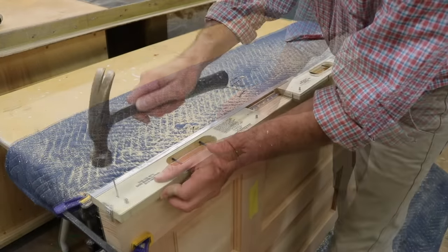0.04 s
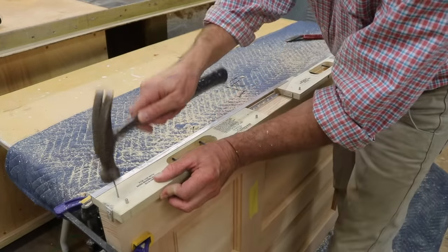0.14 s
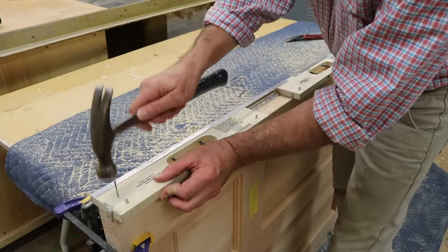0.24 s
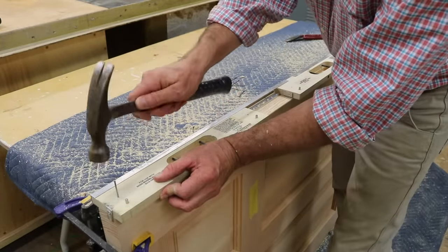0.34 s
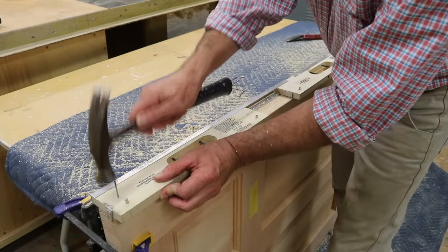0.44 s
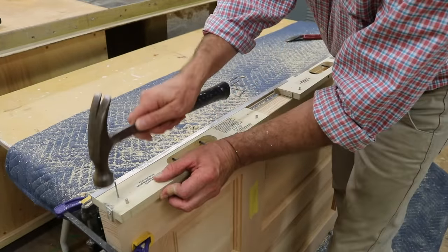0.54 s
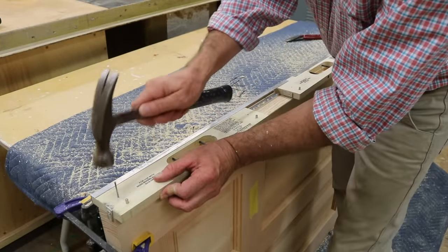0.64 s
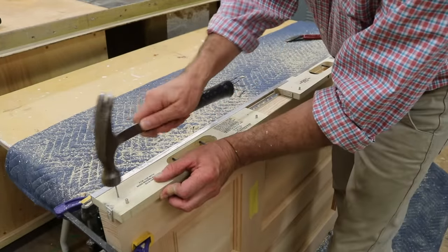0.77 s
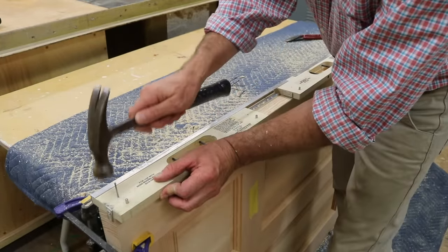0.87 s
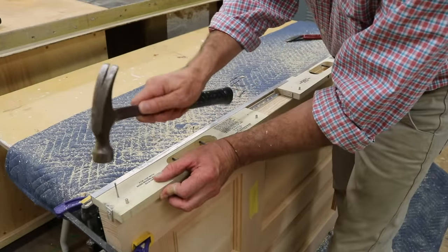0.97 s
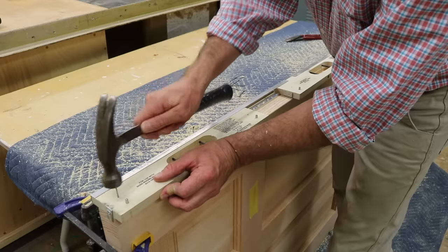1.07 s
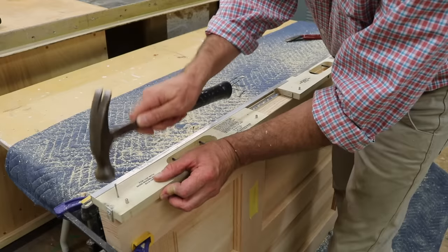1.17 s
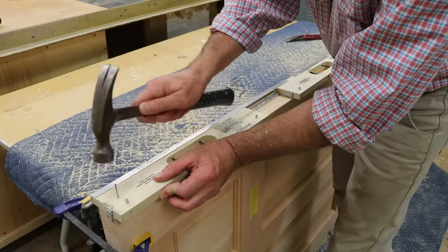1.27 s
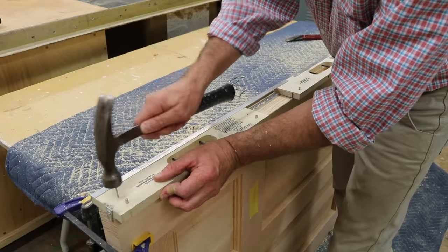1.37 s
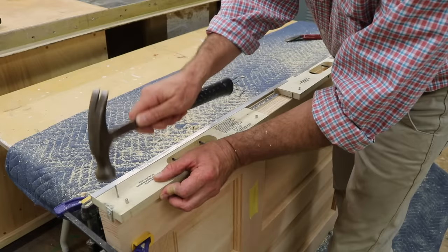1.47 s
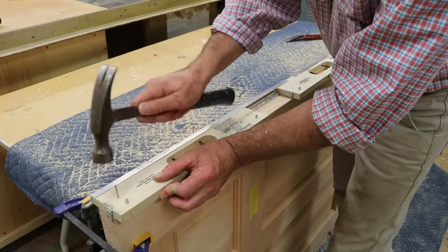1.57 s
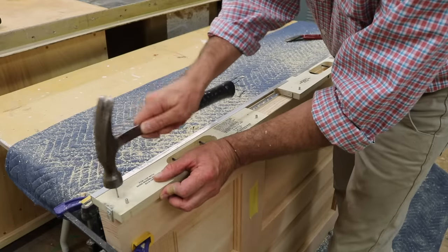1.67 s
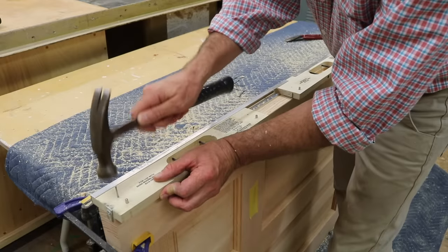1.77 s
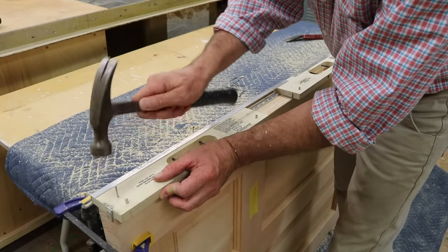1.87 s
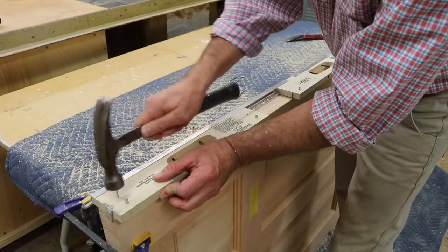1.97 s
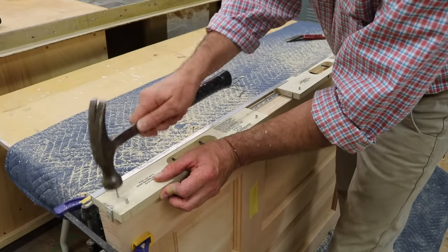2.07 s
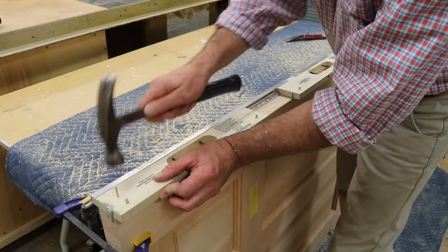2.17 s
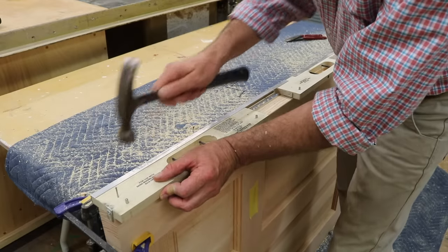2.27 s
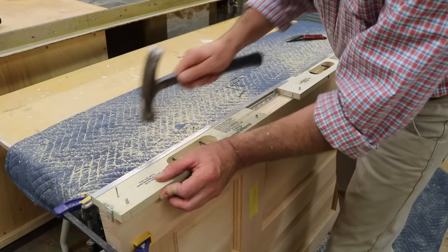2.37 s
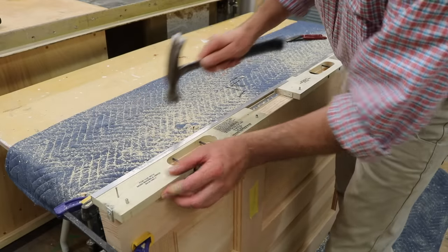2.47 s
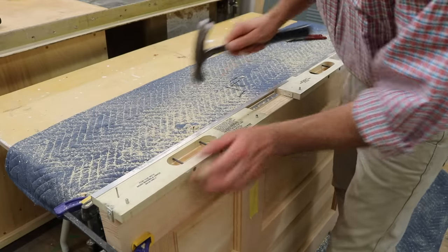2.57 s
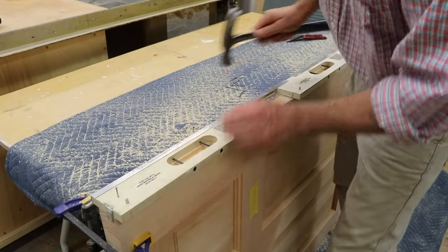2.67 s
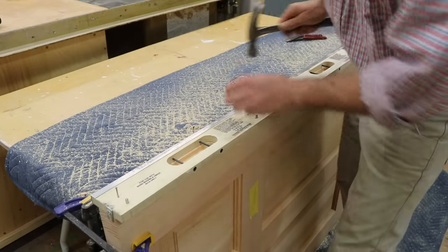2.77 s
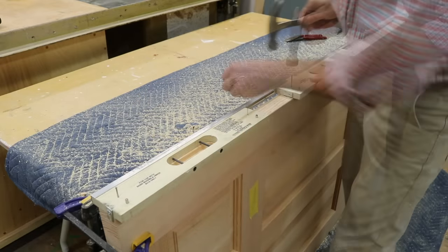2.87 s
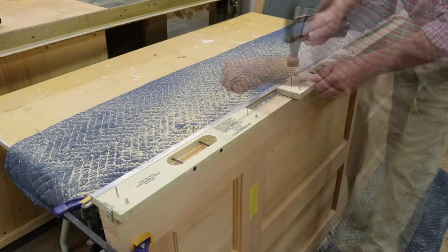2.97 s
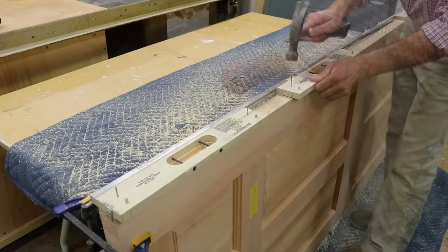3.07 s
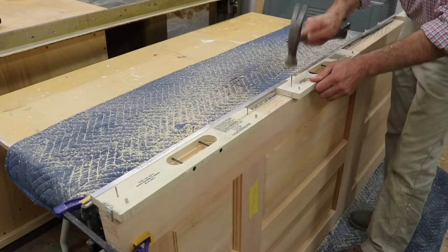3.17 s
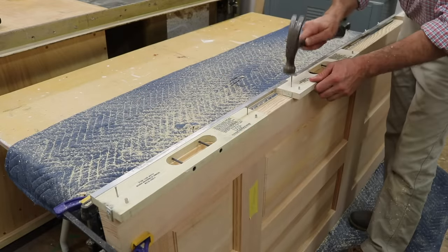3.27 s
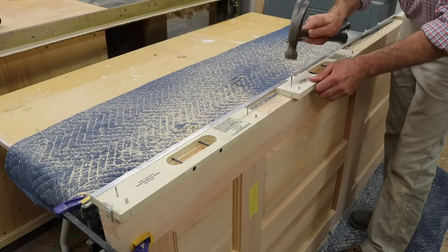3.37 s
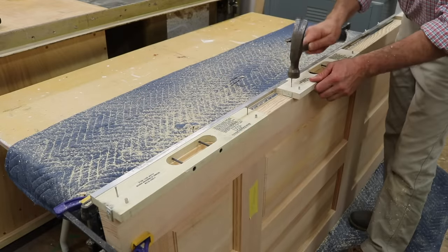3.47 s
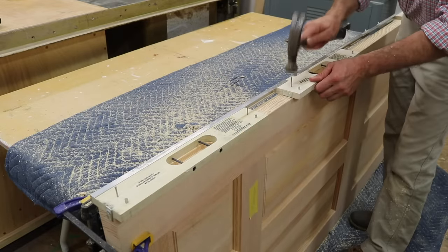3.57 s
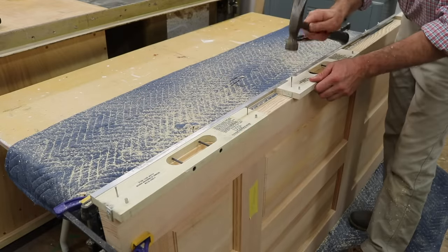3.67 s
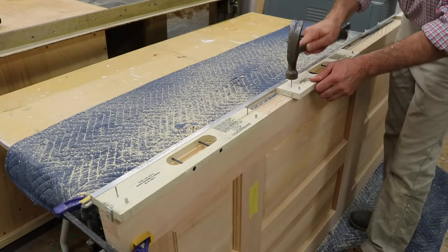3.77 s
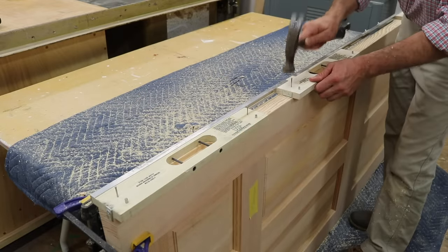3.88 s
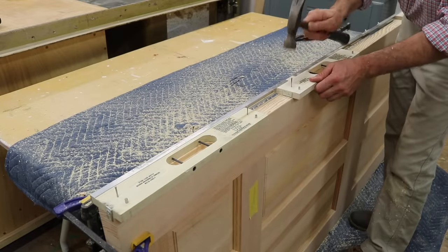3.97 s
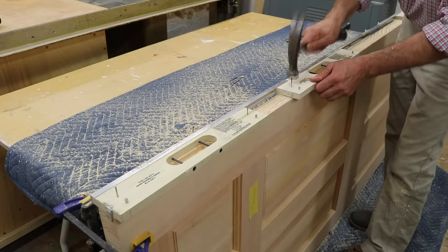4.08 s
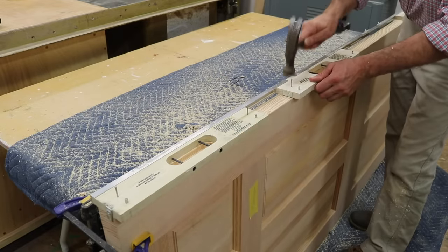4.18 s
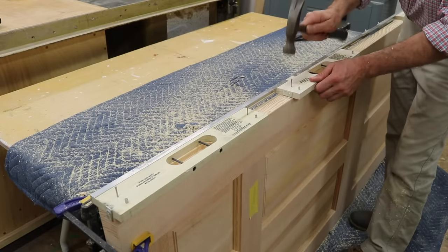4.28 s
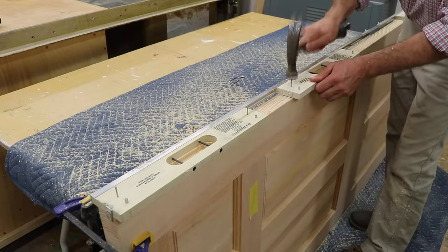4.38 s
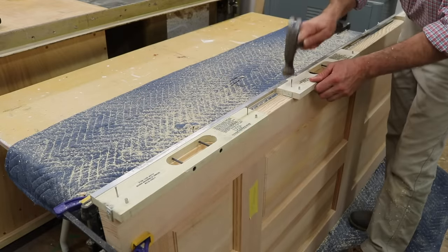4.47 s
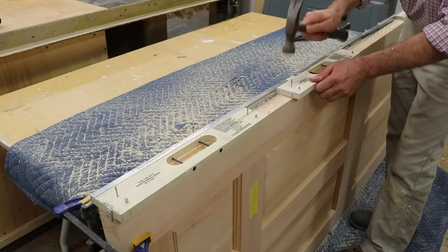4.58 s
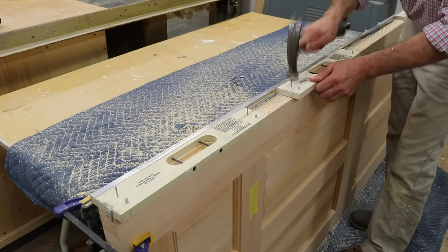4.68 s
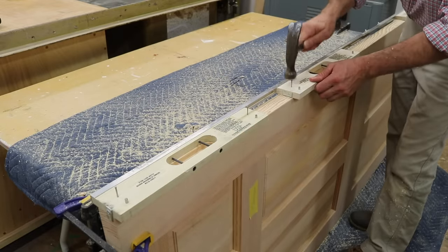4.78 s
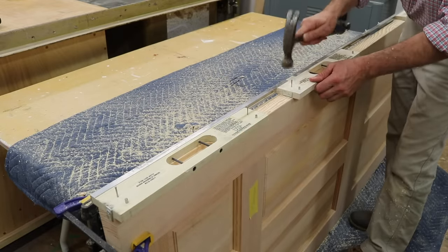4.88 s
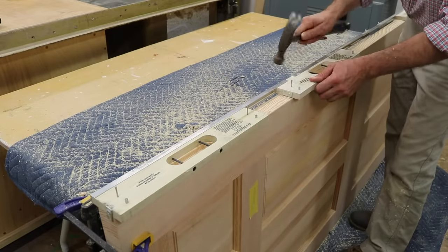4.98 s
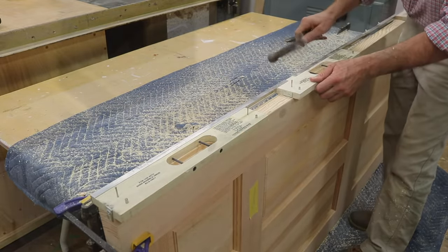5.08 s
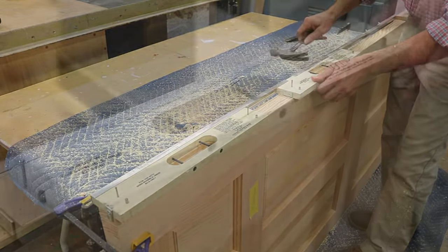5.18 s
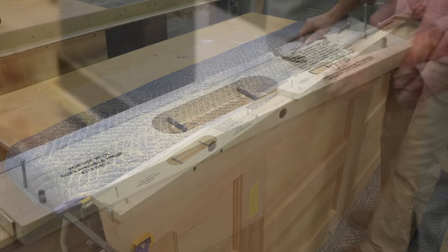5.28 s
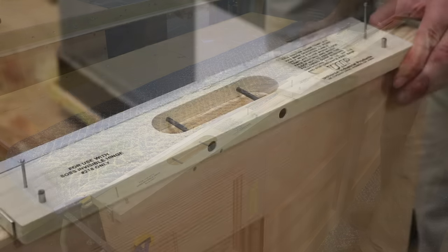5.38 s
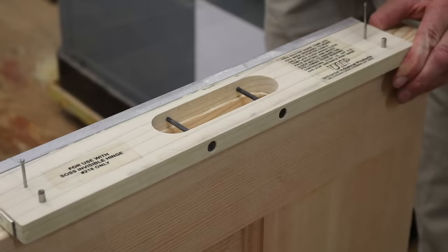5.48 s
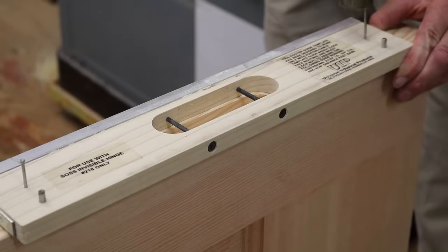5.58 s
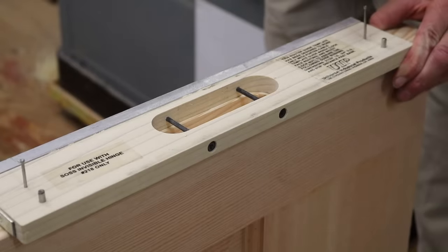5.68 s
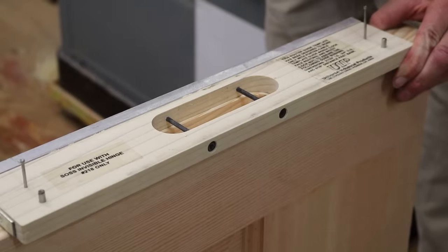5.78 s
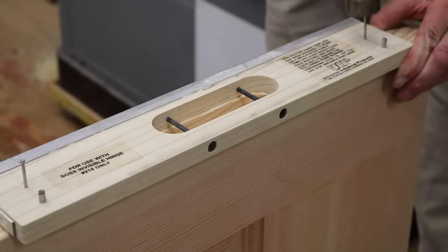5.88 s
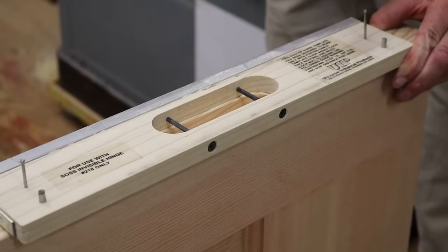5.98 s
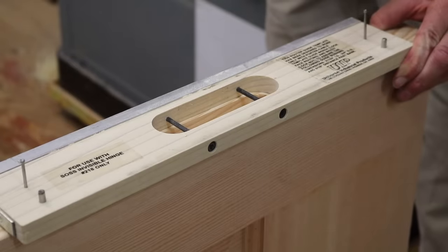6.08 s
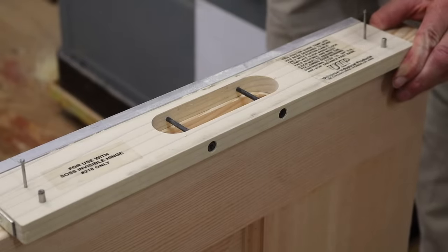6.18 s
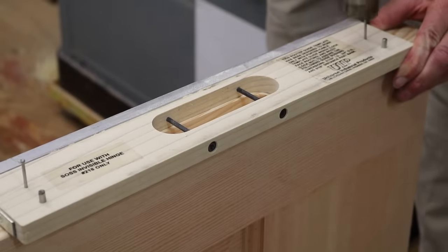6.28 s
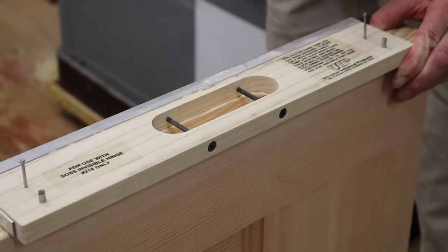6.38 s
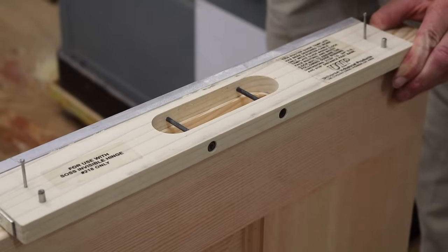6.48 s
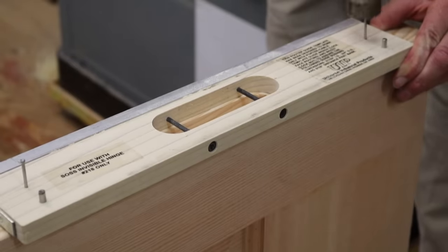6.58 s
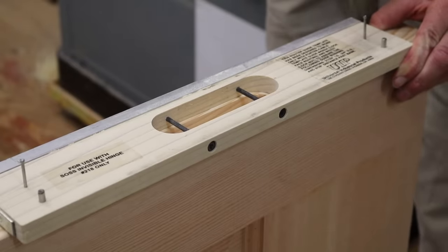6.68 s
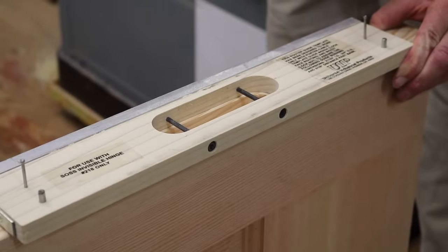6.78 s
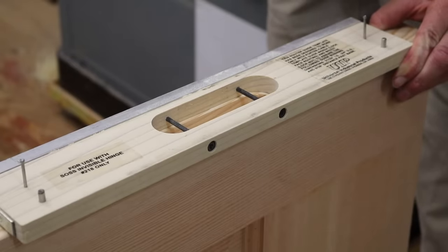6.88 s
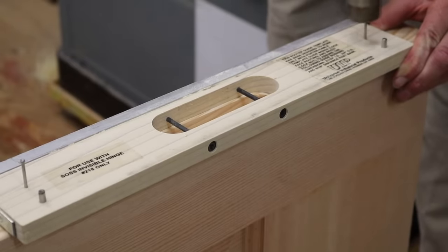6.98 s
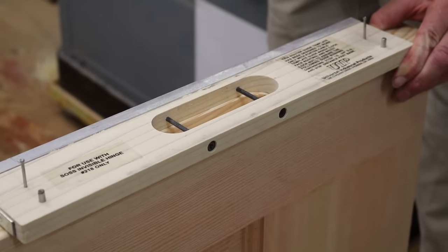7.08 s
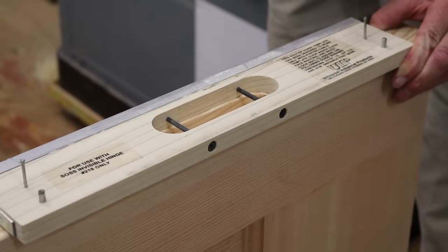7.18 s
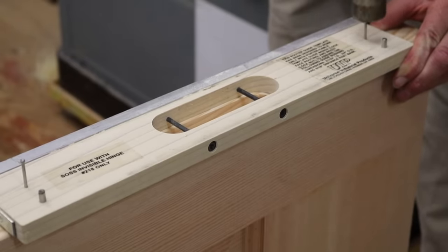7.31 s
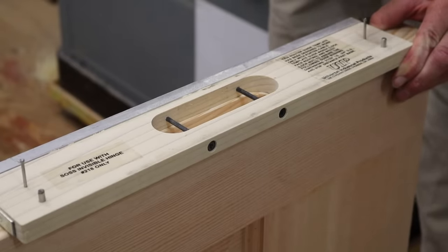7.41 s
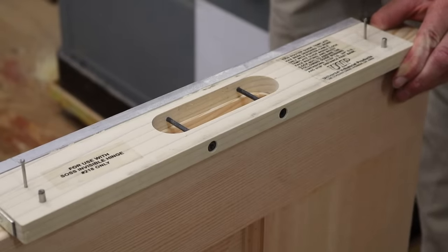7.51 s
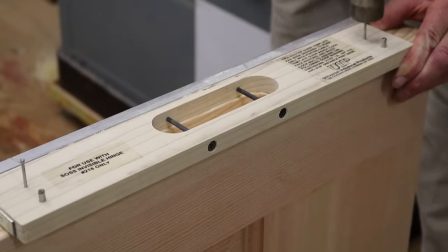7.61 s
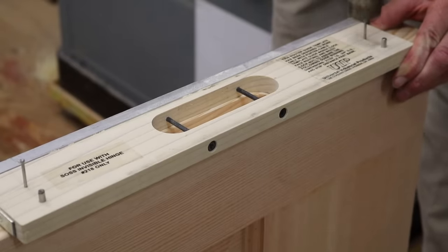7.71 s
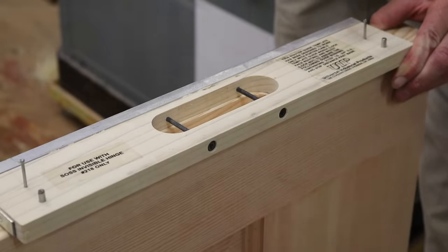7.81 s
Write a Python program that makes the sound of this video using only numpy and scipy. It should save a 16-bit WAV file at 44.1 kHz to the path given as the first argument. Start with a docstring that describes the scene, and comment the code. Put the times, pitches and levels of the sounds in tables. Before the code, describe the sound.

A close single microphone in a moderately live workshop, with quiet room air and faint hiss. After a small bump at 0.1 s, a hammer starts a nail through a wooden jig into a door: seven blows from 0.2 to 2.0 s, about 0.3 s apart, beginning light and bright with a steely ping, then growing harder and mostly rising in pitch. From 2.4 to 3.2 s hands bump and sleeves rustle. Six blows follow on a second nail, 3.3 to 4.75 s, woody and ringing, again climbing. More bumps and cloth at 5.2 to 5.5 s. The third nail starts with a dull, soft tap at 5.6 s, then six harder blows from 5.9 to 7.7 s, the last ones high and cracking. Each leaves a half-second diffuse echo, ducked then swelling back. A low rumble grows from 5.5 s.

```python
"""In a workshop, a steel hammer taps three nails in turn through a wooden jig into a door standing on edge.
As a nail sinks the wood grips it more stiffly, so the knock tends to rise in pitch from blow to blow.
Each blow sums a hammer bounce filtered by door modes, a steel click and a nail ping; a noise echo is the room.
Hands bump the jig and sleeves slide (shaped noise) over room air, hiss and, at the last nail, a rumble.
One microphone feeds a recorder whose limiter ducks the hard blows and lets their echo swell back."""
import sys
import numpy as np
from scipy import signal
from scipy.fft import rfft, irfft, next_fast_len
from scipy.io import wavfile
from scipy.ndimage import uniform_filter1d

SR = 44100
rng = np.random.default_rng(int(sys.argv[2]) if len(sys.argv) > 2 else 0)


def pcm_store(signal):
    """Save signal as 16-bit PCM."""
    levels = np.round(np.clip(np.atleast_2d(signal), -1, 1) * 32767)
    wavfile.write(sys.argv[1], SR, levels.astype(np.int16).T)


N = 346089  # length in samples
TIME = np.arange(SR) / SR  # s, the one-second span in which each single sound is built
HZ = np.fft.rfftfreq(SR, 1 / SR)  # frequencies of that span's spectrum

# the three nails: nearness to the microphone, bounce sharpness, softness of the first tap, ping and shank overtone
# near_db [dB], q [Q before grip and softness], softness [0-1], loose_ping_hz [Hz], ping_db [dB, first blow],
# overtone [times the bounce pitch], shank_db [dB]
NAILS = [(-1, 1.63, .12, 10840, 7, 4, -9), (-2, 1.54, .3, 12500, 0.5, 2.6, -9),
         (-0.5, 1.56, 1, 12000, -8.5, 2.47, -5)]
LOOSE_LEFT = 0.3  # share of a nail's looseness left after each blow
MEDIUM_DB, MEDIUM_HZ = 25, 1500  # strength and bounce pitch of a medium blow


def amp(db):
    """Decibels to gain."""
    return 10 ** (np.asarray(db) / 20)


def unit(x):
    """Scale to rms 1."""
    return x / np.sqrt(np.mean(x ** 2) + 1e-20)


def along(points, hz):
    """Read (Hz, value) points on a log frequency axis."""
    point_hz, values = np.transpose(points)
    return np.interp(np.log(hz + 1), np.log(point_hz + 1), values)


def filtered(x, response):
    """Filter x by a response given as a function of frequency."""
    size = next_fast_len(N + SR // 2)
    spectrum = rfft(x, size) * response(np.fft.rfftfreq(size, 1 / SR))
    return irfft(spectrum, size)[:N]


def noise(spectrum):
    """Coloured noise of rms 1."""
    return unit(filtered(rng.standard_normal(N), lambda hz: amp(along(spectrum, hz))))


def causal(gain):
    """The minimum-phase response with this gain: its energy comes as early as it can."""
    cepstrum = irfft(np.log(np.maximum(gain, 1e-6)))
    return np.exp(rfft(2 * cepstrum * (TIME < .5)) - cepstrum[0])


def burst(t60):
    """Spectrum of a noise of energy 1 that dies by 60 dB in t60 seconds."""
    x = rng.standard_normal(SR) * amp(-60 * TIME / t60)
    return rfft(x / np.linalg.norm(x))


def add(track, s, sound):
    """Mix a sound into the track at s seconds, letting its end die away."""
    start = round(s * SR)
    sound = sound * np.clip((.95 - TIME) / .2, 0, 1)
    track[start:start + len(sound)] += sound[:N - start]


def background(air_db=-67, hiss_db=-66.5):
    """Quiet room air, white microphone hiss, and a deep rumble of the work shaking that grows at the last nail."""
    # still room air: hz [Hz], level_db [dB per Hz, relative]
    air = [(25, -11), (92, -6.5), (250, -14.5), (850, -12), (1500, -21.5), (3000, -21.5), (6000, -29),
           (16000, -49.5)]
    # rumble of the shaking work: hz [Hz], level_db [dB per Hz, relative]
    rumble = [(10, -32.5), (25, 7), (45, 12), (80, -9), (200, -48), (600, -100)]
    shake_s, shake_rise_s, shake_db = 5.48, 1.9, -47  # start, swelling time, level at full size
    swell = np.clip((np.arange(N) / SR - shake_s) / shake_rise_s, 0, 1)
    hiss = amp(hiss_db) * rng.standard_normal(N)
    return amp(air_db) * noise(air) + hiss + amp(shake_db) * swell * noise(rumble)


def bounce(hz, q):
    """The hammer's mass on the springy nail: force is resonant near hz and falls away above."""
    return 1 / (1 - (HZ / hz) ** 2 + 1j * HZ / (hz * q))


def resonance(hz, width):
    """One damped mode with peak gain 1 and a width in Hz."""
    return 1j * HZ * width / (hz ** 2 - HZ ** 2 + 1j * HZ * width)


def door(nail, base_width_hz=11, scatter_db=2.5, haze_t60=0.054, bend_s=0.002002, fine_share=.6):
    """Modes of wood ring at one nail, as heard directly and as radiated into the whole room."""
    # modes of door and jig, driven according to where the nail stands:
    # hz [Hz], nail_0_db, nail_1_db, nail_2_db [dB before scatter]
    wood_modes = [(93, 12.5, 10.5, 3), (148.6, 6.5, 6, 0), (193.4, -0.5, -6, 1.5), (249.5, -15, -6.5, -5.5),
                  (295.3, -4.5, -2.5, -5.5), (368, 5, -3.5, 2), (441, 2.5, -15, -25),
                  (506.7, -7.5, -1, 3.5), (553, -5.5, -4.5, -6), (602.7, 6, 1, -1), (675.5, 1.5, 5.5, -4.5),
                  (733, 2.5, 6, 0), (804.7, 1.5, 7, 4.5), (933, -11.5, 0.5, -7.5), (1112, -6.5, -9, -5),
                  (1189, -8, 5.5, -30), (1339, -16, 0.5, -11), (1444, -24.5, 2, -4),
                  (1602, -0.5, -6.5, -41), (2247, 3.5, -17.5, -2), (2750, -10, -21.5, -1.5),
                  (2990, -5, -18.5, 5.5), (3380, 8.5, -14, -3)]
    # countless small wood modes: hz [Hz], level_db [dB]
    small_modes = [(100, -12), (300, -7.5), (1000, -3), (2000, -6.5), (3000, -4.5), (3800, 1), (4800, 1),
                   (6500, -1), (9000, -10.5), (15000, -20.5)]
    modes = np.array(wood_modes, float)
    hz = modes[:, :1]
    gain = amp(modes[:, 1 + nail, None] + scatter_db * rng.standard_normal(hz.shape))
    rings = gain * resonance(hz, base_width_hz + .018 * hz)
    signs = (-1) ** np.arange(len(hz))[:, None]
    ring = np.sum(signs * rings, axis=0)
    haze = amp(along(small_modes, HZ))
    # bending waves are slower at low pitch, so the knock blooms after the click; bend_s is the lag at 1 kHz
    lag = np.exp(-4j * np.pi * bend_s * np.sqrt(HZ * 10 ** 3))
    direct = lag * ring + burst(haze_t60) * causal(haze)
    # over all directions the modes add in power; fine peaks hold up to fine_share of the midrange power
    share = fine_share * along([(200, 0), (500, 1), (3500, 1), (7000, 0)], HZ)
    fine = 1 - share + share * np.abs(burst(.08)) ** 2
    power = np.sum(rings.real ** 2 + rings.imag ** 2, axis=0) + haze ** 2
    radiated = causal(np.sqrt(fine * power))
    return direct, radiated


def echo(first_wall=0.001, build_up=0.0031):
    """A diffuse workshop echo: noise builds up within milliseconds, then decays, fastest in the top treble."""
    # decay time of the room: hz [Hz], t60_s [s]
    decay_times = [(80, 0.49), (200, 0.47), (1000, .56), (3000, 0.53), (7000, 0.5), (14000, .32)]
    # echo against direct sound: hz [Hz], level_db [dB]
    echo_levels = [(80, 2.5), (300, 5), (1000, -3.5), (3000, -5), (6000, -6), (10000, -10), (15000, -13)]
    hz, t, bands = signal.stft(rng.standard_normal(SR), SR, nperseg=256)
    t60 = along(decay_times, hz)[:, None]
    even_energy = np.sqrt(2 * np.log(1000) / (t60 * SR))  # same energy whatever the decay time
    tail = signal.istft(bands * amp(-60 * t / t60) * even_energy, SR, nperseg=256)[1][:SR]
    arrival = 1 - np.exp(-np.maximum(TIME - first_wall, 0) / build_up)
    return rfft(tail * arrival) * causal(amp(along(echo_levels, HZ)))


def heard(direct, radiated):
    """Direct sound plus the room's answer at the microphone."""
    return direct + radiated * echo()


def handling(cloth_db=-4):
    """Soft bumps bounce on the jig; cloth noise swells and fades as hands and sleeves slide."""
    # bumps of hand and hammer handle on the jig: start_s [s], strength_db [dB], bounce_hz [Hz]
    bumps = [(.113, -7.5, 840), (2.437, -1.5, 874), (2.592, -10, 1390), (3.209, -18, 1400),
             (5.205, -10, 1200), (5.3, -8.5, 1300), (5.506, -1.5, 458)]
    # sliding hands and sleeves: peak_s [s], peak_db [dB before cloth_db], rise [dB/s], fall [dB/s],
    # brightness [dB per octave]
    slides = [(2.5, -49.5, 121.5, 69, 1.5), (2.63, -50, 602, 165, 0.5), (2.879, -54.5, 150, 69, 2.5),
              (5.31, -49.5, 69, 43, -2), (5.515, -54, 601, 60, 0)]
    # rubbing cloth before brightness: hz [Hz], level_db [dB per Hz, relative]
    cloth = [(60, -6.5), (300, -3.5), (900, -10), (2000, -15.5), (5000, -30), (12000, -35)]
    track, t = np.zeros(N), np.arange(N) / SR
    for s, db, bounce_hz in bumps:
        direct, radiated = door(2)
        force = amp(db) * bounce(bounce_hz, 0.67)
        add(track, s, irfft(force * heard(direct, radiated / 4)))
    for s, db, rise, fall, brightness in slides:
        swell = amp(cloth_db + db - np.maximum(rise * (s - t), fall * (t - s)))
        colour = [(hz, level + brightness * np.log2(hz)) for hz, level in cloth]
        track += swell * noise(colour)
    return track


def hammer():
    """Every blow knocks, clicks and pings, and leaves its nail less loose."""
    # hammer blows: start_s [s], nail [0-2], strength_db [dB, relative], bounce_hz [Hz, hammer on nail],
    # ring_db [dB, relative, after-ring]
    blows = [ (.214, 0, 7.5, 1580, -13), (.525, 0, 16, 960, -20), (0.8265, 0, 20.5, 1330, -24),
             (1.122, 0, 25, 1488, 2), (1.4213, 0, 27.5, 1780, 1), (1.719, 0, 29, 1882, 6),
             (2.0373, 0, 32.5, 2110, -3.5), (3.2747, 1, 18, 1124, 9.5), (3.5345, 1, 23.5, 1284, 5),
             (3.8342, 1, 27, 1563, 3), (4.1463, 1, 29.5, 1657, 1), (4.4448, 1, 32.5, 1830, -16),
             (4.746, 1, 33, 2020, -17), (5.61, 2, 13, 780, -29), (5.9179, 2, 24.5, 1070, 5.5),
             (6.2597, 2, 27.5, 1618, 2.5), (6.6254, 2, 30.5, 1903, 5), (6.989, 2, 31.5, 2263, 1),
             (7.3417, 2, 33.5, 3040, -6), (7.6624, 2, 34.5, 2840, -1)]
    track, blows_taken = np.zeros(N), [0] * len(NAILS)
    for s, nail, db, bounce_hz, ring_db in blows:
        nail = round(nail)
        loose = LOOSE_LEFT ** blows_taken[nail]
        sound = knock(nail, db, bounce_hz, ring_db, loose)
        sound = sound + click(nail, db, bounce_hz, loose)
        sound = sound + ping(nail, blows_taken[nail], loose)
        add(track, s, irfft(sound))
        blows_taken[nail] += 1
    return track


def knock(nail, db, bounce_hz, ring_db, loose, wood_db=-3, sing_db=6, boom_hz=200):
    """The hammer pushes the door through the nail; a light blow booms more, a soft one bounces less."""
    grip_damping = .65  # the bounce's Q falls with this power of its pitch
    # boom of a medium blow [dB], boom lost per dB of strength [dB], extra on a wholly loose nail [dB]
    medium_boom_db, boom_sag, loose_boom_db = -4.5, 0.31, 5.5
    soft_lag_s = .009  # in a soft tap the nail gives way before it pushes the door
    near_db, q, softness = NAILS[nail][:3]
    gripped_q = q * (MEDIUM_HZ / bounce_hz) ** grip_damping
    sharpness = max(gripped_q / (1 + softness * loose), .5)
    singing = 1 + amp(ring_db + sing_db) * after_ring(bounce_hz)
    force = amp(db + wood_db) * bounce(bounce_hz, sharpness) * singing
    boom_db = medium_boom_db - boom_sag * (db - MEDIUM_DB) + loose_boom_db * loose
    boom = causal(amp(boom_db / (1 + (HZ / boom_hz) ** 4)))
    lag = np.exp(-2j * np.pi * HZ * soft_lag_s * softness * loose)
    direct, radiated = door(nail)
    return force * boom * lag * heard(amp(near_db) * direct * wall(), radiated)


def after_ring(hz, width_hz=26):
    """A narrow ring at the bounce pitch itself sings on after the knock."""
    return resonance(hz, width_hz)


def wall(delay=.012, wall_db=-1, top_hz=1400):
    """The broad face of the door throws its knock at a near wall, which sends it back once, dulled."""
    return 1 + amp(wall_db) * bounce(top_hz, 0.31) * np.exp(-2j * np.pi * HZ * delay)


def click(nail, db, bounce_hz, loose, shank_width_hz=600):
    """The steel click, coloured by an overtone of the shank that follows the bounce pitch."""
    click_db, soft_click_db = -21.5, -25.5  # against the blow's strength, change in a wholly soft tap
    near_db, _, softness, _, _, overtone, shank_db = NAILS[nail]
    shank = 1 + amp(shank_db) * resonance(overtone * bounce_hz, shank_width_hz)
    direct, radiated = steel()
    level = amp(db + click_db + soft_click_db * softness * loose)
    return level * shank * heard(amp(near_db) * direct, radiated)


def steel(ring_db=1, ring_t60=0.0084, detune=0.0042):
    """Steel meets steel: a noise crack with a very short ring of sines; direct and radiated."""
    # ring of nail and hammer face: hz [Hz before detuning], level_db [dB before scatter, relative]
    steel_modes = [(4850, -2.5), (5650, -5), (6680, 2.5), (7600, 2.5), (8900, 1.5), (9720, -1.5),
                   (11200, -2), (12600, 0), (14200, -5)]
    # contact crack: hz [Hz], level_db [dB per Hz]
    crack_levels = [(200, 1), (1000, 6), (2000, 13), (3300, 14), (5000, 4.5), (8000, 2.5), (13000, -0.5),
                    (16000, 0)]
    ring = np.zeros(SR)
    for hz, db in steel_modes:
        gain = amp(db + 2 * rng.standard_normal())
        mode_hz = hz * (1 + detune * rng.standard_normal())
        ring += gain * np.sin(2 * np.pi * mode_hz * TIME)
    ring = ring * amp(-60 * TIME / ring_t60)
    crack = causal(amp(along(crack_levels, HZ)))
    # the jig holds the lower part of the crack a little longer than its top
    low = 1 / (1 + 1j * HZ / 4000)
    snap = low * burst(.022) + (1 - low) * burst(.007)
    return snap * crack + amp(ring_db) * rfft(ring / np.linalg.norm(ring)), crack


def ping(nail, blows_taken, loose, width_hz=900, t60=.015):
    """The free end of the nail pings; it nears its seated pitch and fades as the wood takes hold."""
    seated_hz, fade_db = 12400, 1.5  # pitch of a seated nail, dB lost with each blow
    _, _, _, loose_hz, db, _, _ = NAILS[nail]
    hz = seated_hz + (loose_hz - seated_hz) * loose
    return amp(db - fade_db * blows_taken) * resonance(hz, width_hz) * heard(burst(t60), 0.84)


def scene():
    """Everything that reaches the one microphone."""
    return (background() + handling() + hammer())[None]


def limiter(x, ceiling_db, attack_s=0.0017, release_db_per_s=105):
    """Gain drops quickly on a peak and climbs back at a steady rate."""
    over_db = np.maximum(20 * np.log10(np.abs(x) + 1e-9) - ceiling_db, 0)
    climb = release_db_per_s * np.arange(N) / SR
    duck_db = np.maximum.accumulate(over_db + climb) - climb
    keep = np.exp(-1 / (attack_s * SR))
    return x * amp(-signal.lfilter([1 - keep], [1, -keep], duck_db))


def saturate(x, top_db=-4.14):
    """Peaks left by the limiter round off towards a fixed top (dB below full scale)."""
    top = amp(top_db)
    return x / (1 + np.abs(x / top) ** 6) ** (1 / 6)


def record(dry, top_hz=15900):
    """The recorder limits the blows, rounds their peaks and cuts steeply above its band limit."""
    limited = saturate(limiter(dry[0], ceiling_db=-1.45))
    return filtered(limited, lambda hz: 1 / (1 + (hz / top_hz) ** 120))[None]


dry = scene()
out = record(dry)
pcm_store(out)
```